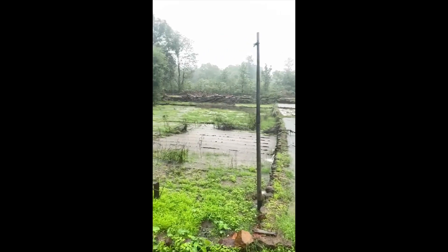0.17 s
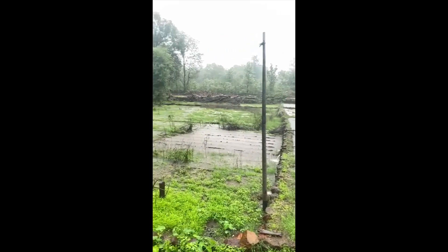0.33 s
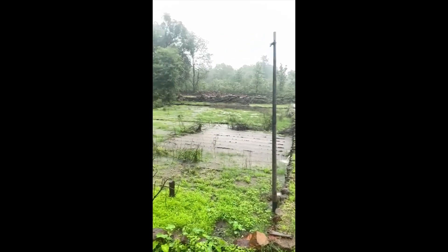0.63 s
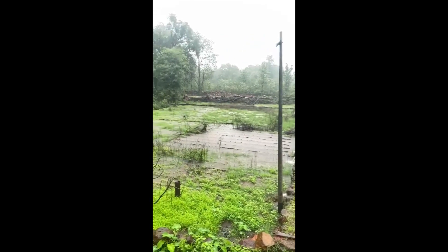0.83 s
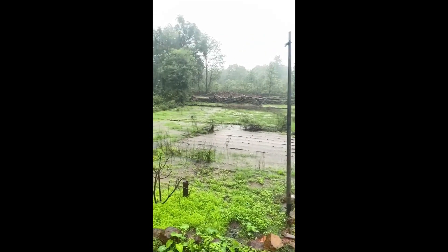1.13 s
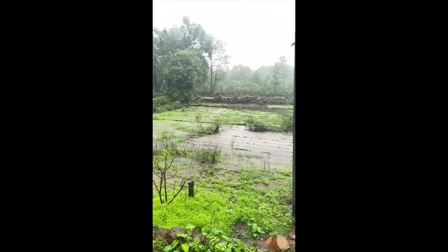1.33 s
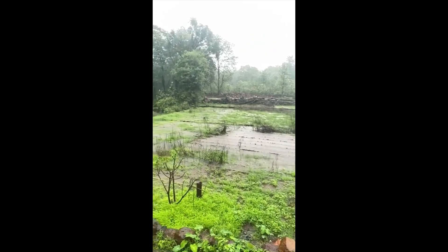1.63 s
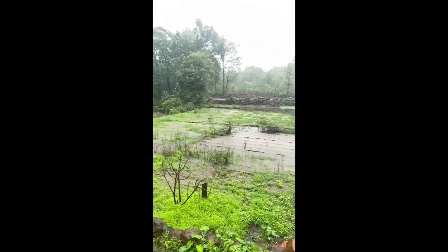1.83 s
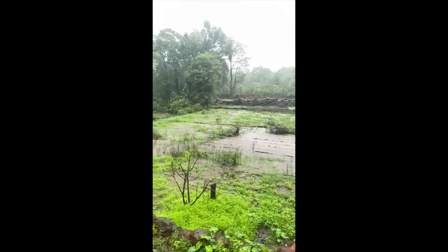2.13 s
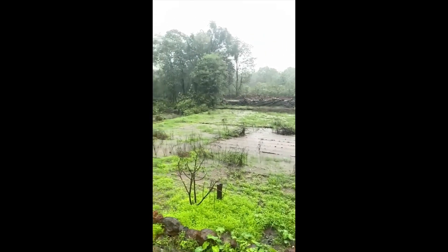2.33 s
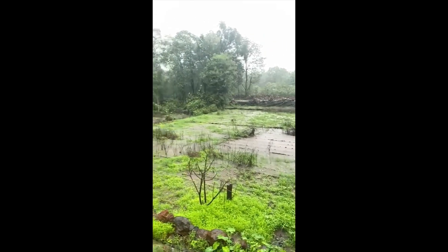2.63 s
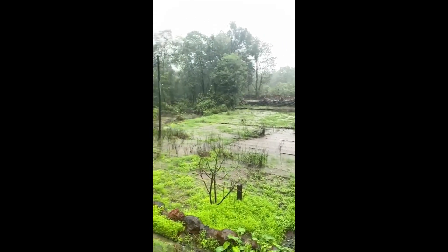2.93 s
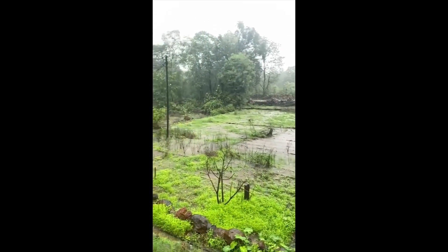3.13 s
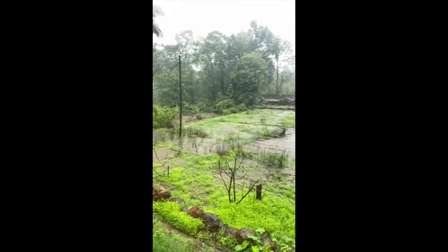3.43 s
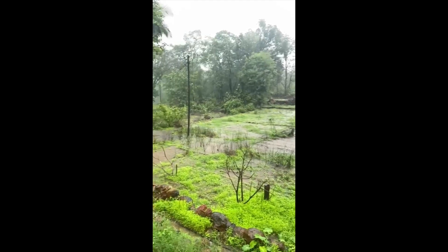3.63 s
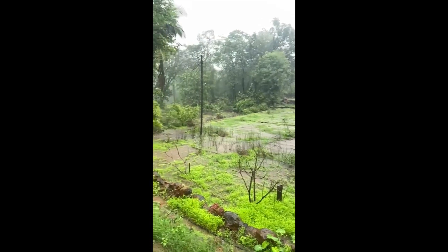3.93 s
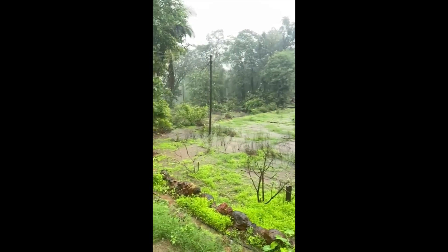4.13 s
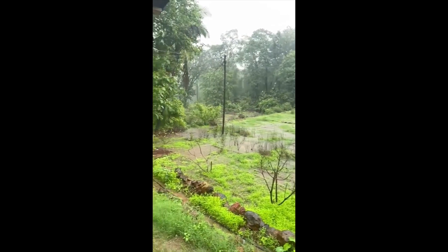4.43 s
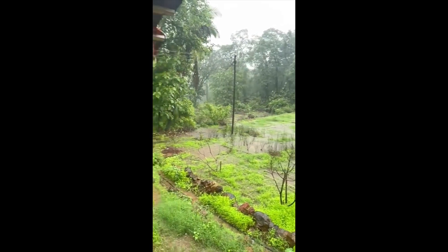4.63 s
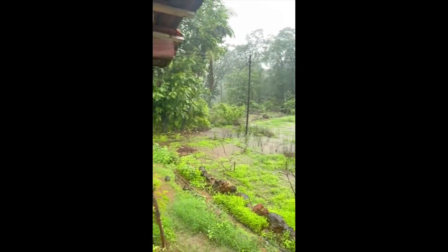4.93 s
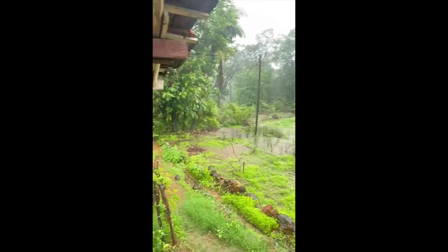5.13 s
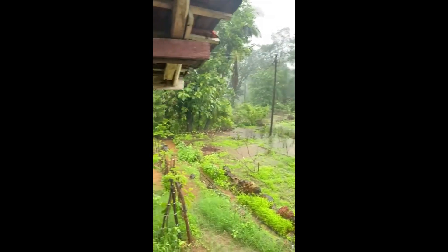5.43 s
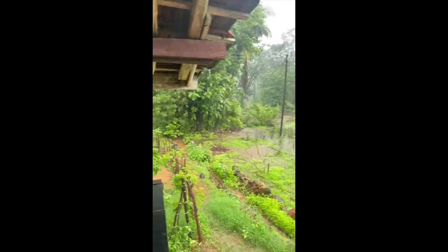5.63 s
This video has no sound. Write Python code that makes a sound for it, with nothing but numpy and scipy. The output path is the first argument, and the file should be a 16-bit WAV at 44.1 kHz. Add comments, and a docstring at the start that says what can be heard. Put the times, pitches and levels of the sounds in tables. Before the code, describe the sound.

Heavy rain falls without pause for nearly six seconds, heard outdoors from a porch beside flooded fields, through a close-set stereo pair with a wide, diffuse hiss and a dulled extreme top. Countless distant drops form a dense mid-range roar, topped by bright spray that flutters slightly. Random nearer drops crackle over it: dry taps on leaves, thick patter on wet soil, tiny fizzing bubbles. Low roof drumming swells and eases softly, over a faint deep rumble. Close, snappy plinks with rising pitch stand out at about 0.5, 1.1, 1.7 (strongest), 2.4, 3.1, 3.4, 3.6, 4.3, 5.0 and 5.3 s. Fainter ringing puddle drips, slightly left, come near 0.7, 2.2 to 2.5, in a quick bubbling run at 4.1 to 4.3, then 4.7 and 5.5 s. A soft low thump falls at 2.9 s, with much fainter ones after 5.1 s, where the rain briefly lifts about a decibel before easing.

```python
"""Heavy rain on flooded fields, leaves and a roof, heard from a porch through a pair of microphone ports.
Roar, roof drumming, bright spray and low rumble: coloured noise; soft low thumps.
Patter of nearer drops: dense random sine bursts. Close plinks and drips: timed sine bursts, pitch rising.
Tables set likeness and phase lead between the sides by frequency; one treble band is nearly out of phase."""
import sys
import numpy as np
from scipy import signal
from scipy.fft import rfft, irfft, next_fast_len
from scipy.io import wavfile
from scipy.ndimage import uniform_filter1d, map_coordinates

SR = 44100
rng = np.random.default_rng(int(sys.argv[2]) if len(sys.argv) > 2 else 0)


def bounce(signal):
    """Save signal as a 16-bit WAV file at the path given by the first command-line argument."""
    frames = np.transpose(np.atleast_2d(signal))
    limited = np.clip(frames, -1, 1)
    pcm = np.round(limited * 32767).astype(np.int16)
    wavfile.write(sys.argv[1], SR, pcm)


def gain_from_db(level_db):
    """Turn a decibel level (scalar or array-like) into a linear amplitude factor."""
    decades = np.asarray(level_db, float) / 20
    return 10 ** decades


N = 254456

# rain strength, base of the noise layers: t/s, level/dB
STRENGTH_DB = [(0.0, -24), (2.12, -24), (5.05, -24), (5.18, -23), (5.36, -23.5), (5.77, -24.5)]
# noise spectra, relative density: f/Hz, level/dB
RUMBLE_SPECTRUM = [(15, -45), (27, -45), (40, -27), (48, -30), (59, 4), (70, -7), (90, -2.5), (120, -40)]
SPRAY_SPECTRUM = [(1500, -50), (3500, -0.5), (4500, 1), (6000, 0), (7000, -6.5), (8000, -3.5), (9000, -5.5),
                  (11000, -6), (11700, -10.5), (12500, -19.5), (14500, -29)]
DRUM_SPECTRUM = [(60, -37), (100, -8), (132, -5), (145, 3), (157, -5), (185, -1), (205, -5.5), (220, -0.5),
                 (240, -7), (400, -7.5), (900, -56)]
ROAR_SPECTRUM = [(150, -14), (420, -1.5), (520, -2.5), (700, 0), (880, -3), (1100, -3.5), (1800, -7),
                 (2500, -4.5), (3500, -7.5), (6000, -31.5)]
# soft low thumps: t/s, f/Hz, peak level/dB
THUMPS = [(2.91, 59, -31.5), (5.15, 58, -44), (5.55, 58, -42)]
# surges of the drumming: t/s, swell/dB
SURGES_DB = [(0, 1), (.5, -0.5), (.9, 0), (1.03, -3), (1.27, 1.5), (1.4, -1), (1.8, -1), (2.1, -3.5),
             (2.7, -0.5), (3.2, -4), (3.7, -3), (4.3, -1), (4.7, -3), (5.2, -1), (5.45, -2.5), (5.77, -3.5)]
# close short plinks, pitch rising: t/s, f/Hz, peak level before pan/dB, left minus right/dB
CLOSE_PLINKS = [(.4706, 2700, -14.5, -5), (1.0975, 4940, -13.5, -3), (1.1047, 4850, -15.5, 4),
                (1.7083, 4200, -17, -2), (1.7087, 7300, -7, -1), (1.7094, 7600, -20, -6),
                (2.4058, 7770, -16, 0), (2.5069, 7470, -16, 1), (3.1224, 2690, -17.5, -4),
                (3.3664, 8700, -10.5, -1), (3.3686, 9500, -19, -1), (3.5573, 2900, -19, -1.5),
                (3.558, 4900, -10.5, -1.5), (3.5625, 5200, -14.5, -1.5), (4.3215, 5310, -10.5, 2),
                (5.0119, 6780, -12, 0), (5.2615, 2970, -15, -5)]
# close puddle drips, ringing bursts, several of which may make up one drip:
# t/s, f/Hz, peak level before pan/dB
PUDDLE_DRIPS = [(.739, 2450, -24), (2.238, 2320, -24), (2.423, 2590, -23), (2.493, 2790, -23),
                (4.122, 2530, -20.5), (4.133, 2560, -26), (4.143, 2570, -26), (4.204, 2450, -25),
                (4.214, 2850, -25), (4.232, 2950, -26), (4.25, 2500, -25), (4.267, 2000, -25),
                (4.73, 2500, -27), (5.455, 2500, -24)]
# likeness of the two sides: f/Hz, likeness/(-1 to 1), lead of the left/(-1 to 1)
PORT_LIKENESS = [(90, .975, 0), (240, .965, 0), (430, .87, 0), (780, .6, 0), (1450, .68, -.15),
                 (1650, .7, 0), (1870, .88, 0), (2400, .4, .05), (3250, .13, .15), (3950, .47, .25),
                 (4600, .18, .2), (5350, .76, .2), (6050, 0, .4), (6450, -.9, 0), (8200, -.88, 0),
                 (8550, -.72, -.15), (8850, -.25, -.3), (9200, .6, -.2), (9450, .9, 0), (9850, .35, .2),
                 (10800, .25, .2), (11500, .6, .1), (12000, 0, .1)]
# balance of the two sides: f/Hz, left minus right/dB
PORT_TILT_DB = [(150, -0.5), (430, -2.5), (900, 0), (1200, 1), (2000, 0), (3100, -0.6), (4000, -0.5)]


def unit(x):
    """Scale to rms 1."""
    return x / np.sqrt(np.mean(x ** 2) + 1e-20)


def along(points, hz, axis=1):
    """One column of a frequency table, read on a log frequency axis."""
    table = np.transpose(points)
    return np.interp(np.log(hz + 1), np.log(table[0] + 1), table[axis])


def curve(rows):
    """Second column of a time table, one value per sample."""
    time_s, value = np.transpose(rows)
    return np.interp(np.arange(N) / SR, time_s, value)


def wobble(knots_per_s):
    """Smooth random curve through random knots."""
    knots = rng.standard_normal(int(N * knots_per_s / SR) + 4)
    return map_coordinates(knots, [np.arange(N) * knots_per_s / SR])


def turned_s():
    """Time from mid-scene, for drifts as the listener turns toward the eaves."""
    return (np.arange(N) - N / 2) / SR


def rush(spectrum, uneven_db):
    """Two unrelated coloured noises, rms 1, gain randomly uneven over time and frequency."""
    _, _, z = signal.stft(rng.standard_normal((2, N)), SR, nperseg=512)
    field = uniform_filter1d(rng.standard_normal(z.shape), size=3, axis=1)  # over frequency
    field = uniform_filter1d(field, size=7, axis=2)  # over time
    pair = signal.istft(z * gain_from_db(uneven_db * unit(field)), nperseg=512)[1][:, :N]
    m = next_fast_len(N)
    colour = gain_from_db(along(spectrum, np.fft.rfftfreq(m, 1 / SR)))
    return unit(irfft(rfft(pair, m) * colour, m)[:, :N])


def bursts(time_s, hz, peak_db, cycles, rise, size=640):
    """Sine bursts peaking at time_s, then dying; pitch climbs by the share rise over one life."""
    step = np.arange(-size // 2, size)  # samples kept around the peak
    turns = step / SR * hz[:, None]
    life = turns / cycles[:, None]
    shape = np.exp(-np.where(life < 0, 20, 6) * life ** 2)  # rises faster than it falls
    phase = 2 * np.pi * turns * (1 + rise[:, None] * life / 2)
    wave = gain_from_db(peak_db)[:, None] * shape * np.cos(phase)
    at = np.clip(np.round(time_s * SR).astype(int)[:, None] + step, 0, N)
    return np.bincount(at.ravel(), wave.ravel(), N + 1)[:N]


def thumps():
    """Soft low thumps: cosines under a Gaussian envelope."""
    half_length_s = 0.025
    out = np.zeros(N)
    for time_s, hz, peak_db in THUMPS:
        t_s = np.arange(N) / SR - time_s
        out += gain_from_db(peak_db) * np.exp(-(t_s / half_length_s) ** 2) * np.cos(2 * np.pi * hz * t_s)
    return out


def rumble():
    """Low rumble of far drops merged into noise, drifting with the turn, plus the thumps."""
    level_db, drift_db_per_s, wobble_db = -17.5, 0.5, 0.34
    gain_db = curve(STRENGTH_DB) + level_db + drift_db_per_s * turned_s() + wobble_db * wobble(6)
    pair = gain_from_db(gain_db) * rush(RUMBLE_SPECTRUM, uneven_db=0.3)
    pair[0] += thumps()
    return pair


def spray(gust):
    """Bright spray: far drops merged into treble noise, swaying with the gust and drifting with the turn."""
    level_db, drift_db_per_s, gust_db = -4.5, 0.27, 1.09
    gain_db = curve(STRENGTH_DB) + level_db + drift_db_per_s * turned_s() + gust_db * gust
    return gain_from_db(gain_db) * rush(SPRAY_SPECTRUM, uneven_db=2.1)


def drumming():
    """Rain on the roof: drops merged into low noise that comes in surges."""
    level_db = -5.5
    return gain_from_db(curve(STRENGTH_DB) + level_db + curve(SURGES_DB)) * rush(DRUM_SPECTRUM, uneven_db=0.2)


def drops(count, low_hz, high_hz, level_db, cycles, rise, size):
    """Random nearer drops, each from one side or the other; levels in dB thin out exponentially."""
    when, pitch, rank, length, side = rng.random((count, 5)).T
    time_s = when * N / SR
    hz = low_hz * (high_hz / low_hz) ** pitch
    peak_db = level_db - 2.9 * np.log(rank + 0.021)

    def track(track_db):
        return bursts(time_s, hz, track_db, cycles * (0.5 + length), rise * length, size)

    every = track(peak_db)
    one_side = track(np.where(side < 0.5, peak_db, -200))  # the rest silenced
    return np.array([every, every - 2 * one_side])  # side = sign of the second track


def patter():
    """Nearer drops: dry taps on leaves, puddle bubbles, dense patter on wet soil, fizz of tiny bubbles."""
    leaves = drops(1500, low_hz=2510, high_hz=10300, level_db=-30, cycles=2.7, rise=0.36, size=64)
    puddles = drops(400, low_hz=1946, high_hz=3165, level_db=-44, cycles=54, rise=0.2, size=640)
    soil = drops(5000, low_hz=1240, high_hz=6000, level_db=-36, cycles=5.3, rise=0.57, size=128)
    fizz = drops(500, low_hz=3210, high_hz=5920, level_db=-39, cycles=28, rise=0.21, size=400)
    return leaves + puddles + soil + fizz


def plinks_and_drips():
    """Close short plinks, each with a short bright crack at its peak, and ringing drips; panned by level."""
    plink_cycles, plink_rise = 6.5, 0.6
    drip_cycles, drip_rise, drip_pan_db = 28, 0.12, 4
    crack_hz, crack_cycles, crack_db = 10000, 1.3, -8  # level re the plink's peak
    rows = [(*row, plink_cycles, plink_rise) for row in CLOSE_PLINKS]
    rows += [(*row, drip_pan_db, drip_cycles, drip_rise) for row in PUDDLE_DRIPS]
    rows += [(s, crack_hz, db + crack_db, pan_db, crack_cycles, 0) for s, _, db, pan_db in CLOSE_PLINKS]
    time_s, hz, peak_db, pan_db, cycles, rise = np.transpose(rows)
    left = bursts(time_s, hz, peak_db + pan_db / 2, cycles, rise)
    right = bursts(time_s, hz, peak_db - pan_db / 2, cycles, rise)
    return left, right


def roar(gust):
    """Roar of the fields: countless far drops merged into dense noise, swaying with the gust."""
    level_db, gust_db = -0.42, 0.5
    return gain_from_db(curve(STRENGTH_DB) + level_db + gust_db * gust) * rush(ROAR_SPECTRUM, uneven_db=1.42)


def ports(pair, close):
    """Two sides: tables set likeness, phase lead and balance between them by frequency."""
    m = next_fast_len(N + SR // 4)
    hz = np.fft.rfftfreq(m, 1 / SR)
    a, b = rfft(pair, m)
    turn_rad = np.arccos(np.clip(along(PORT_LIKENESS, hz), -1, 1)) / 2
    lead = np.clip(along(PORT_LIKENESS, hz, axis=2), -1, 1)
    mid = np.cos(turn_rad) * a
    side = 1j * np.sin(turn_rad) * (lead * a + np.sqrt(1 - lead ** 2) * b)
    # close drops, one direction: a pure phase lead
    left, right = rfft(np.array(close), m) * np.exp([1j * turn_rad, -1j * turn_rad])
    tilt = gain_from_db(along(PORT_TILT_DB, hz) / 2)
    return irfft(np.array([(mid + side + left) * tilt, (mid - side + right) / tilt]), m)[:, :N]


def scene():
    """Rain far and near, through the two ports."""
    gust = wobble(14)  # shared by spray and roar
    rain = rumble() + spray(gust) + drumming() + patter() + roar(gust)
    return ports(rain, plinks_and_drips())


def band_limit(x):
    """A steep low-pass at the top of the band."""
    return signal.sosfilt(signal.butter(12, 12770, fs=SR, output="sos"), x)


def record(dry):
    """The finished mix, as stored."""
    return band_limit(dry)


dry = scene()
out = record(dry)
bounce(out)
```